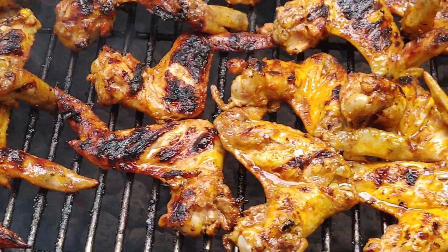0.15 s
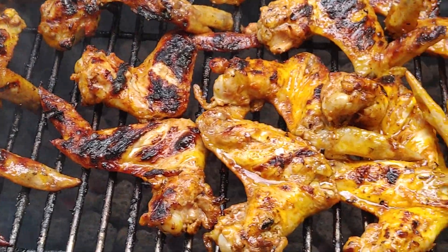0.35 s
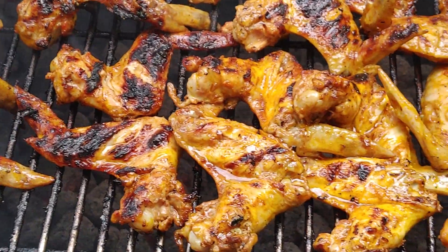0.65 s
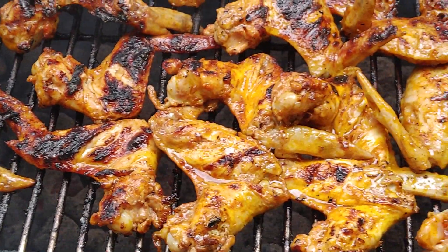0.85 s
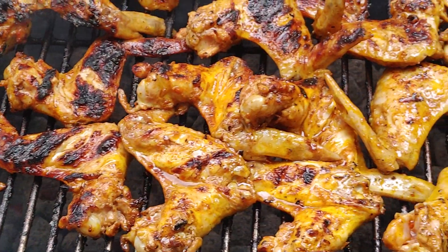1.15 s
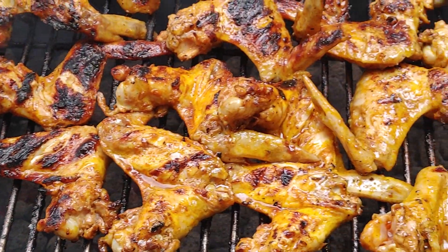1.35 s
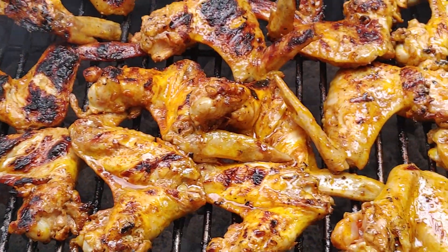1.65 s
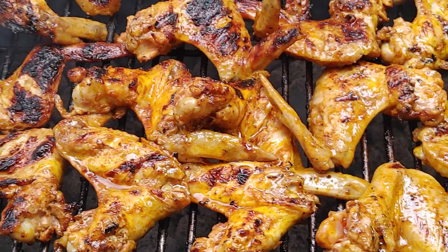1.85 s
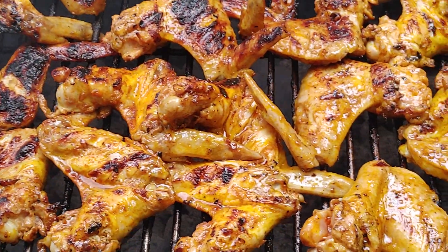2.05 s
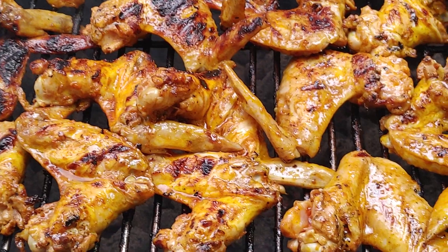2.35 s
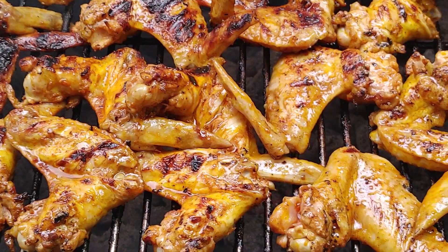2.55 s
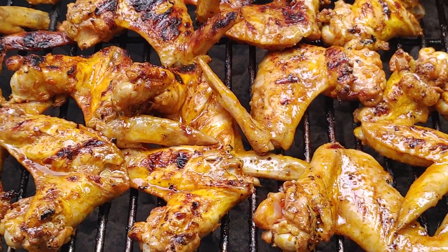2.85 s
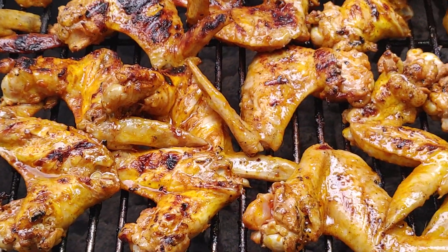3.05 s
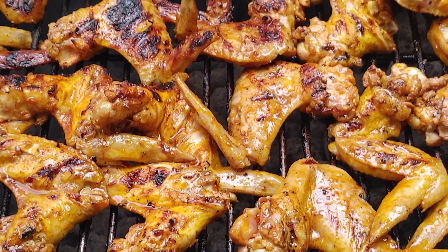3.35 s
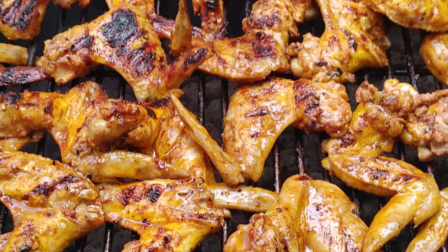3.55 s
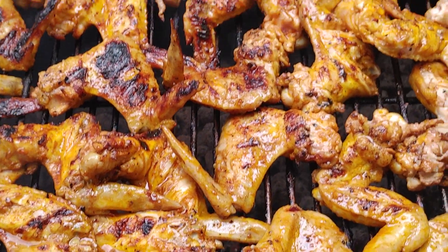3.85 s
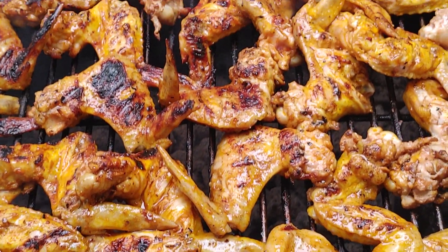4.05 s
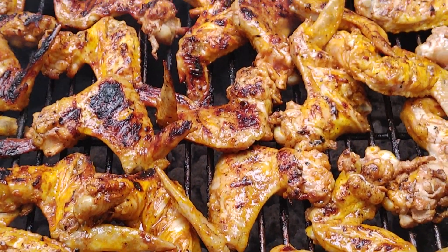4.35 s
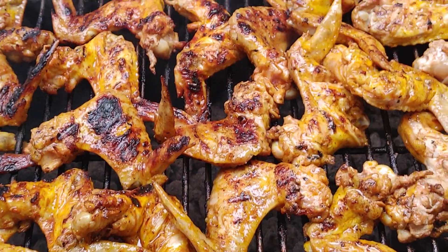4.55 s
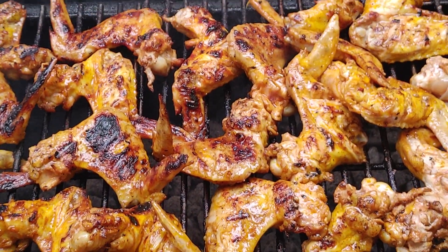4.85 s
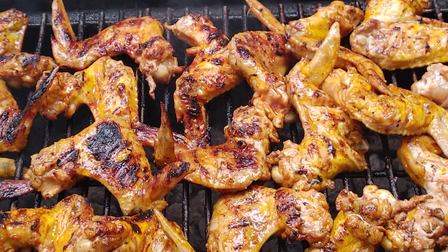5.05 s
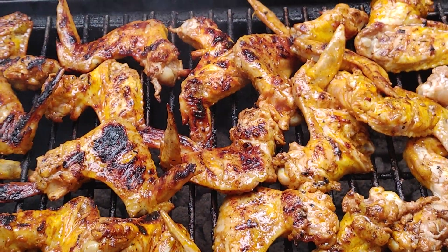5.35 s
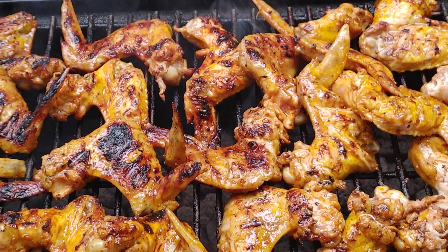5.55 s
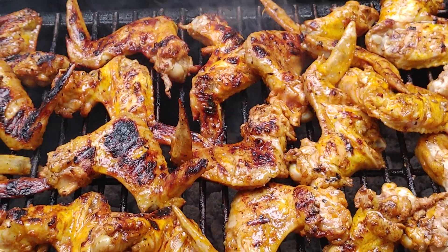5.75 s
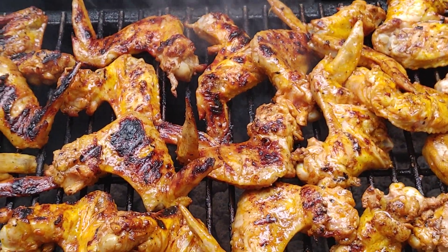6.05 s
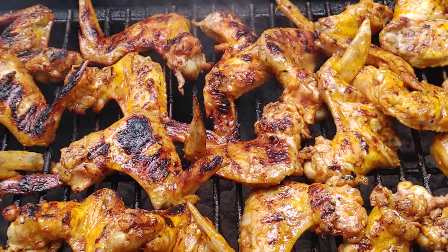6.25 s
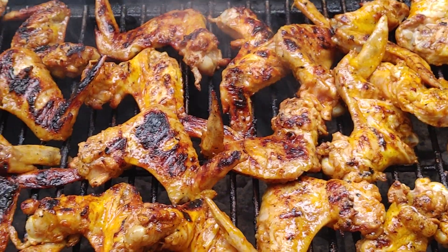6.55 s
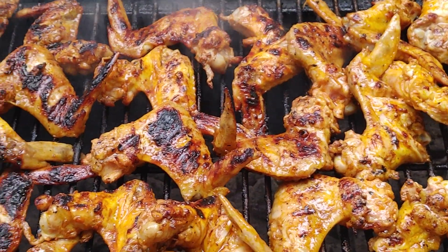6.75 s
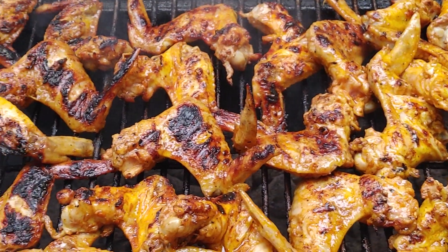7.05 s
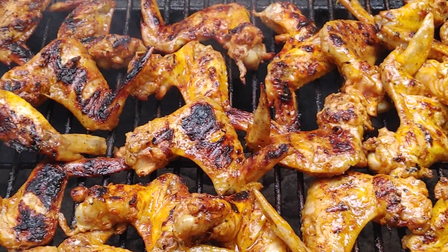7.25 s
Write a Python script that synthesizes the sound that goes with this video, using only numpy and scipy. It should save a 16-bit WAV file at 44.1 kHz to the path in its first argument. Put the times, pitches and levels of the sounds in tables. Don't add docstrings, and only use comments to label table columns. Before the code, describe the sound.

A dense, crisp sizzle of fat over hot coals, with irregular snaps, tiny drips and faint low puffs, heard very close in stereo.

```python
import sys
import numpy as np
from scipy import signal
from scipy.fft import rfft, irfft, next_fast_len
from scipy.io import wavfile

SR = 44100
rng = np.random.default_rng(int(sys.argv[2]) if len(sys.argv) > 2 else 0)


def elevation(decibels):
    levels = np.asarray(decibels, float)
    return 10 ** (levels / 20)


def store_pcm(level_fs):
    pcm = np.round(np.clip(level_fs, -1, 1) * 32767).astype(np.int16)
    wavfile.write(sys.argv[1], SR, np.atleast_2d(pcm).T)


N = 326781
FFT_SIZE = next_fast_len(N + 4096)
RIGHT_LAG_SAMPLES = 184
RIGHT_SHADE_DB = -8
SPIT_S = 0.0093
BOWL_HZ, BOWL_T60_S = 239, 0.035

# time in seconds, level in dB.
HEAT = [(0, -39), (.5, -40), (1.2, -40.5), (1.85, -40), (2.15, -41), (2.45, -39.5), (2.95, -40),
        (3.4, -39.5), (3.8, -41.5), (4.5, -41.5), (5.2, -40.5), (5.6, -41), (6.1, -41), (6.6, -41),
        (7.41, -41.5)]
# time in seconds, lift in dB, length in seconds.
SURGES = [(0.14, -4.5, 0.2), (0.348, 2.5, 0.13), (0.486, -0.5, 0.13), (0.544, 4, 0.042), (0.609, 2, 0.088),
          (0.813, -1.5, 0.05), (0.982, 2, 0.3), (1.596, -5, 0.064), (1.706, 3.5, 0.099), (1.816, -4, 0.33),
          (1.905, 5, 0.029), (2.02, 9, 0.042), (2.11, -0.5, 0.118), (2.252, 3.5, 0.17), (2.554, 1.5, 0.067),
          (2.86, -4.5, 0.094), (2.9, 6, 0.029), (3.038, -1.5, 0.1), (3.307, 3.5, 0.03), (3.462, -3.5, 0.18),
          (3.542, 3.5, 0.23), (3.92, -4, 0.058), (3.991, 2, 0.05), (5.07, -3, 0.12), (5.3, 5, 0.063),
          (5.454, -4, 0.1), (5.69, -6.5, 0.074), (5.913, 1, 0.091), (6.438, -3.5, 0.09), (6.715, -5, 0.094)]
# time in seconds, lift in dB.
SPITS = [(0.065, 2.2), (0.541, 3), (0.605, 8.5), (0.755, 0), (0.885, 2), (1.703, 2), (1.924, 8), (2.254, 6),
         (2.555, 0), (2.896, 1), (3.251, 5), (3.504, 7), (3.54, 8), (3.841, 5), (3.989, -1), (4.117, 4),
         (4.259, 3), (4.446, -1), (4.624, 0), (4.935, 5), (5.021, 4), (5.293, 2), (5.653, 6), (5.736, -1),
         (5.793, 4), (5.882, 9), (6.465, 6), (6.535, 1), (7.118, 0), (7.25, -3)]
# time in seconds, lift in dB.
RIM = [
    (0, -0.5),
    (1.3, -0.5),
    (2.3, -1),
    (3.6, 0),
    (4.5, 3),
    (5.3, 4),
    (7.41, 1),
]
# frequency in Hz, left in dB per Hz, right in dB per Hz.
BODY = [(30, -33.5, -34.5), (59.4, -28, -23.5), (96, -17.5, -17), (129, -22.5, -27), (170, -17.5, -18.5),
        (230, -14, -14.5), (307, -17.5, -18.5), (398, -26, -21.5), (489, -22, -23.5), (592, -13.5, -13),
        (696, -24, -22.5), (870, -15.5, -21.5), (1193, -10, -12), (1360, -7, -10.5)]
# frequency in Hz, left in dB per Hz, right in dB per Hz.
PORTS = [(2130, -11.5, -8), (2740, -2.5, -3), (3240, -3.5, -3), (3730, 0, -1.5), (5170, -0.5, -0.5),
         (5800, -6.5, -2.5), (6220, -2, 1), (8050, 0.5, -6), (9800, -14, -8.5), (9840, -6, -13),
         (10940, -2, -4.5), (11600, 3, -3), (12760, -7.5, -11), (14900, -11, -8.5)]
# frequency in Hz, width in Hz, lift in dB.
BARS = [
    (590, 92, -4.5),
    (710, 26, 5.5),
    (1030, 28, 7.5),
    (1151, 56, 6.5),
    (1422, 92, 5),
    (1606, 21, 5.5),
    (4050, 300, 3),
]
# start in seconds, left in dB, right in dB, ring in Hz.
POPS = [(0.0431, -11, -15, 6500), (0.3557, -1, -6, 11800), (0.3618, -17, -13, 6590),
        (0.5453, -19, -21, 4150), (0.7551, -14, -25, 4000), (0.9584, -32, -20, 6500),
        (1.3803, -49, -15, 4470), (1.6346, -11, -13, 4070), (1.7061, -18, -21, 3930),
        (1.9243, -11, -14, 10720), (2.1788, -10, -14, 4120), (2.2492, -23, -16, 7150),
        (2.5326, -10, -8, 7400), (2.6924, -18, -26, 4060), (2.7454, -12, -21, 7190),
        (2.8835, -11, -20, 10590), (2.8961, -27, -19, 7750), (3.2596, -17, -20, 7240),
        (3.3111, -28, -6.5, 6250), (3.3748, -11, -7, 6980), (3.4145, -12, -10, 7000),
        (3.5378, -10, -23, 11370), (3.8056, -20, -13, 5930), (4.0292, -14, -56, 4130),
        (4.5443, -8, -12, 7600), (4.6152, -15, -18, 3900), (5.2898, -20, -16, 6700),
        (5.3324, -10, -24, 7800), (5.7929, -17, -20, 7970), (5.9169, -11, -14, 6930)]
# start in seconds, left in dB, ring in Hz.
LEFT_POPS = [(0.8795, -13, 3600), (1.173, -19, 3700), (1.8947, -17, 5170), (2.016, -12, 4830),
             (2.0674, -15, 6590), (2.317, -24, 4950), (2.549, -20, 7670), (2.9764, -7, 11630),
             (3.3634, -16, 3800), (3.9865, -19, 11460), (4.446, -6, 11840), (4.495, -15, 6800),
             (4.507, -14.5, 3830), (4.6273, -14, 4050), (4.9345, -13, 11370), (5.0201, -15, 4050),
             (5.736, -14, 11540), (5.88, -15, 5440), (6.2029, -10, 7900), (6.6223, -16.5, 4070),
             (7.0425, -20, 4390), (7.117, -18, 7920), (7.25, -9, 10810), (7.3682, -10, 7240)]
# start in seconds, peak in dB, ring in Hz.
LEFT_CRACKLES = [(0.0581, -32, 1290), (0.1323, -30, 1300), (0.5349, -38.0, 1650), (0.5765, -40, 1030),
                 (0.6027, -41, 503), (1.1736, -35, 1030), (1.2085, -36, 1030), (1.2725, -36.0, 1030),
                 (1.9234, -36, 1300), (2.1448, -51, 710), (2.2486, -26, 1660), (2.6983, -38.0, 1300),
                 (3.3871, -43, 1030), (3.5369, -32, 710), (3.7561, -33, 1310), (3.7659, -32, 1620),
                 (4.3154, -60, 1650), (4.398, -42, 500), (4.6162, -32, 1300), (5.0709, -28, 1320),
                 (5.1571, -33, 1300), (5.288, -28.5, 710), (5.3593, -43, 500), (5.7351, -39, 1300),
                 (5.7898, -40.0, 1650), (6.5482, -31, 1650), (7.2302, -34, 1300), (7.2808, -30, 1650)]
# start in seconds, peak in dB, ring in Hz.
RIGHT_CRACKLES = [(0.0577, -35, 1030), (0.4707, -37, 1030), (0.5363, -41.0, 1300), (1.6337, -31.5, 2110),
                  (1.8351, -32, 1300), (2.2489, -29, 1290), (3.3339, -48, 500), (3.7561, -40, 494),
                  (4.0276, -47, 710), (4.395, -41.0, 2100), (4.7181, -42, 1650), (4.841, -38.0, 1650),
                  (5.0649, -48, 1650), (5.1576, -18, 2100), (5.4965, -35.5, 1300), (5.7356, -41, 1030),
                  (5.9534, -37, 710), (6.1268, -35, 2100), (6.6281, -38, 490), (6.952, -33, 2100),
                  (6.9773, -52, 1650), (7.0149, -41, 2100), (7.1745, -43, 2100), (7.2806, -37, 1650)]
# start in seconds, left in dB, right in dB, ring in Hz.
DRIPS = [(0.0587, -33, -46, 1340), (0.1183, -28, -35, 1360), (0.2773, -32, -31, 1110),
         (0.578, -33, -35, 1250), (0.7657, -30, -44, 1370), (1.1741, -32, -57, 1180),
         (1.273, -34, -32, 1210), (1.4849, -34, -28, 1390), (1.5541, -32, -40, 1590),
         (2.2497, -30, -35, 1460), (3.3, -38, -44, 1570), (3.3876, -32, -52, 1270),
         (3.5601, -30, -34, 1340), (3.7667, -27, -28, 1680), (4.4268, -43, -77, 1640),
         (4.4829, -46, -48, 1680), (4.4953, -56, -33, 1510), (4.6552, -47, -24, 1940),
         (4.9002, -29, -43, 1320), (5.0713, -47, -44, 1290), (5.1495, -30, -35, 1170),
         (5.2614, -29, -31, 1360), (5.2887, -38, -39, 1510), (5.4972, -25, -32, 1390),
         (5.7359, -63, -34, 1240), (6.0465, -31, -31, 1380), (6.5307, -28, -30.5, 1670),
         (6.6203, -28, -30, 1620), (6.6283, -26, -21, 1590), (7.2815, -39, -35, 1460)]
# start in seconds, peak in dB, ring in Hz.
LEFT_TICKS = [(0.0968, -14, 4100), (0.1744, -15, 5200), (0.2018, -20.0, 11400), (0.2755, -16, 7800),
              (0.424, -21, 5200), (0.4663, -22, 4100), (0.5451, -18, 4000), (0.6033, -17.0, 11400),
              (0.6596, -17, 4100), (0.7349, -20, 7800), (0.7977, -26, 6600), (1.3392, -25, 5200),
              (1.3796, -16.5, 4100), (1.4771, -20.0, 5200), (1.5345, -18, 4100), (1.5539, -23, 11400),
              (1.7056, -18.0, 4130), (2.125, -25, 7800), (2.2492, -22, 3000), (2.5503, -16.0, 7800),
              (2.5715, -15, 6600), (2.896, -9, 6600), (3.0022, -16, 7800), (3.3048, -18.0, 7800),
              (3.5376, -17.0, 5200), (3.7101, -15, 7800), (3.7195, -30, 7800), (3.8411, -20.0, 5200),
              (4.178, -13, 5150), (4.2586, -31, 11400), (4.354, -29, 5200), (4.4642, -21.0, 7800),
              (4.4947, -23, 5200), (4.5069, -31, 4100), (4.655, -21.0, 3040), (4.9578, -21.0, 4100),
              (4.9782, -18, 4100), (5.0673, -23, 5200), (5.2687, -28, 4100), (5.2893, -19.0, 7800),
              (5.5888, -21.0, 6600), (5.6449, -19, 4100), (5.8492, -22, 4100), (6.1512, -24, 4100),
              (6.3387, -15, 11400), (6.4053, -19, 5200), (6.5332, -24, 7800), (6.5582, -28, 5200),
              (6.9919, -21.0, 4100), (7.0038, -22.0, 4100), (7.0427, -24, 4100), (7.1167, -21, 7800),
              (7.1745, -24, 6600), (7.1964, -18, 11400), (7.3178, -23, 3030)]
# start in seconds, peak in dB, ring in Hz.
RIGHT_TICKS = [(0.4235, -14, 5200), (0.451, -19.0, 4100), (0.5453, -14, 5200), (0.7351, -25, 4100),
               (0.7551, -20.0, 7800), (0.9708, -22, 5150), (1.0375, -20.0, 3050), (1.0982, -19.0, 6600),
               (1.535, -21.0, 5240), (1.698, -18, 11400), (1.8843, -24, 5200), (1.9145, -18.0, 6600),
               (2.067, -18, 5200), (2.2837, -20, 3020), (2.3164, -16, 4100), (2.358, -15, 6600),
               (2.4456, -25, 6650), (2.4887, -27, 6600), (2.501, -19, 6600), (2.5503, -16.0, 7800),
               (2.6412, -26, 4100), (2.6856, -13, 6600), (2.7451, -21.0, 6600), (2.783, -21.0, 5200),
               (2.8089, -16, 4080), (2.883, -21.0, 5200), (2.9418, -16, 6600), (3.0949, -24, 5200),
               (3.2596, -26, 6600), (3.364, -20, 3000), (3.4241, -18, 6600), (3.4409, -22.0, 2980),
               (3.539, -19.0, 4100), (3.6, -18, 6600), (3.6203, -23, 3000), (3.6703, -27, 6600),
               (3.761, -30, 11400), (3.7701, -20, 4100), (4.029, -17, 6600), (4.039, -19, 6600),
               (4.1157, -32, 2950), (4.293, -18, 7800), (4.3541, -22.0, 7800), (4.7123, -23.0, 4100),
               (4.9344, -25, 3000), (5.2209, -12.5, 6600), (5.3324, -22.0, 6600), (5.7356, -17, 6600),
               (5.8492, -20, 7800), (6.1513, -13, 6600), (6.4598, -19, 6600), (6.5143, -20, 5200),
               (6.5337, -18, 6560), (6.6822, -16, 7800), (6.9512, -15, 5200)]
# start in seconds, peak in dB.
BOOMS = [(0.294, -46), (0.549, -50), (0.758, -50), (1.468, -50), (1.489, -51), (1.818, -55), (2.244, -53),
         (2.467, -65), (2.664, -56), (2.711, -59), (4.561, -58), (4.698, -62), (4.896, -50), (5.497, -54),
         (5.53, -58), (5.822, -39.5), (5.954, -52), (6.068, -53), (6.213, -45), (6.241, -38), (6.351, -50),
         (6.628, -39.5), (6.645, -50), (7.362, -49)]
# start in seconds, peak in dB, ring in Hz, left-right in dB.
KNOCKS = [(0.297, -45, 694, 7), (0.742, -52, 515, 3.5), (2.246, -60, 930, -0.5), (4.182, -49, 960, 7),
          (4.568, -70, 560, -8), (5.136, -55, 990, 24), (5.287, -50, 1005, 12), (6.107, -41.5, 1000, 11),
          (6.146, -47.5, 696, 5), (6.245, -42, 980, 8), (6.627, -44, 576, 2), (6.631, -34, 1120, 6),
          (7.359, -53, 500, -2)]
# start in seconds, peak in dB, ring in Hz, left-right in dB.
SPATTERS = [
    (5.1612, -27, 2740, -6),
    (5.217, -33, 2440, 1),
    (5.296, -32, 2500, -6),
    (5.3294, -35, 1950, -4),
    (5.741, -36, 2900, -10),
    (5.8736, -28, 2800, -2),
    (5.89, -44, 2790, -3),
]
# start in seconds, peak in dB, push +1 or pull -1.
LEFT_SPLATS = [(.355, -21, 1), (2.1464, -34, 1), (2.5506, -22, 1), (2.8944, -29, 1), (3.3744, -20, -1),
               (3.5377, -35, 1), (3.9866, -20.5, 1), (4.3992, -35, 1), (4.5445, -21.5, 1), (5.3602, -33, 1),
               (6.3685, -26.5, 1), (7.1478, -28, 1), (7.2137, -34, 1), (3.8056, -36, 1), (6.992, -42, 1),
               (1.0525, -40, 1)]
# start in seconds, peak in dB, push +1 or pull -1.
RIGHT_SPLATS = [
    (1.174, -41, -1),
    (1.273, -37, -1),
    (1.555, -32, -1),
    (3.9868, -33, -1),
    (4.0294, -30.5, -1),
    (4.1859, -32, -1),
    (4.4953, -31, -1),
    (5.3328, -29, -1),
]


def rms_one(x):
    return x / np.sqrt(np.mean(x ** 2) + 1e-20)


def drift(rate_hz):
    pole = np.exp(-80 * np.pi * rate_hz / SR)
    noise = rng.standard_normal(N // 40 + 2002)
    slow = signal.lfilter([1], [1, -2 * pole, pole * pole], noise)[2000:]
    return np.interp(np.arange(N) / 40, np.arange(len(slow)), rms_one(slow))


def in_time(rows):
    return np.interp(np.arange(N) / SR, *np.transpose(rows))


def surging():
    t = np.arange(0, N, 64) / SR
    rows = list(SURGES) + [(s, lift_db, SPIT_S) for s, lift_db in SPITS]
    bumps_db = sum(lift_db * np.exp(-(1.96 * (t - s) / length_s) ** 2) for s, lift_db, length_s in rows)
    return np.interp(np.arange(N) / SR, t, bumps_db)


def follow(level_db, heat, surge, rim, flicker_db):
    heat_db = in_time(HEAT)
    swing_db = heat * (heat_db - heat_db.mean()) + surge * surging() + rim * in_time(RIM)
    flicker = 0.18 * drift(4.4) + 0.64 * drift(28) + 0.55 * np.array([drift(36), drift(35)])
    return elevation(heat_db.mean() + level_db + swing_db + flicker_db * flicker)


def causal(gain):
    cepstrum = irfft(np.log(gain + 1e-9), FFT_SIZE)
    cepstrum[..., 1:FFT_SIZE // 2] *= 2
    cepstrum[..., FFT_SIZE // 2 + 1:] = 0
    return np.exp(rfft(cepstrum))


def grill_colour(hz):
    table = np.array([*BODY, *PORTS], float)
    colour = elevation([np.interp(np.log(hz), np.log(table[:, 0]), table[:, side]) for side in (1, 2)])
    for bar_hz, width_hz, lift_db in BARS:
        colour = colour * elevation(lift_db / (1 + (2 * (hz - bar_hz) / width_hz) ** 2))
    return colour


def sizzle(per_s, size_db, cycles, spread_samples, clump_db, hiss_db, near_db):
    chance = rng.random(N)
    clumping = .15 * drift(14) + .9 * drift(90)
    born = np.flatnonzero(chance < per_s * elevation(clump_db * clumping) / SR)
    size_luck, sign_luck, pitch_luck, near_luck = rng.random((N, 4))[born].T
    sizes = elevation(size_db * np.minimum(-np.log(size_luck), 4.0)) * np.sign(sign_luck - .5)
    path = np.round(spread_samples * rng.standard_normal(N)[born]).astype(int)
    late = np.clip(born + RIGHT_LAG_SAMPLES + path, 0, N - 1)
    nearer = elevation(near_db * (near_luck - .5))

    hz = np.arange(FFT_SIZE // 2 + 1) * SR / FFT_SIZE + 1e-3
    pitches_hz = np.geomspace(500, 15000, 14)
    pitch_class = (np.sqrt(pitch_luck) * len(pitches_hz)).astype(int)
    total, power = 0, 0
    for k, pitch_hz in enumerate(pitches_hz):
        mine = pitch_class == k
        left = np.bincount(born[mine], (sizes * nearer)[mine], N)
        right = np.bincount(late[mine], (sizes / nearer)[mine], N)
        bubble = 1 / (1 + 1j * cycles * (hz / pitch_hz - pitch_hz / hz))
        total = total + rfft([left, right], FFT_SIZE) * bubble
        power = power + (2 * k + 1) * abs(bubble) ** 2

    colour = grill_colour(hz)
    bursts = rms_one(irfft(total * causal(colour / np.sqrt(power)), FFT_SIZE)[:, :N])
    far = rng.standard_normal((2, FFT_SIZE))
    hiss = rms_one(irfft(rfft(far) * colour * np.clip(hz / 3500, 0, 1), FFT_SIZE)[:, :N])
    return rms_one(bursts + elevation(hiss_db) * hiss)


def below(x, hz):
    return signal.sosfiltfilt(signal.butter(4, hz, fs=SR, output="sos"), x)


def frying():
    x = sizzle(per_s=9000, size_db=2.0, cycles=1.75, spread_samples=7.0, clump_db=1.6, hiss_db=-8, near_db=6.0)
    to_850, to_2300, to_5500, to_9000, to_13000 = [below(x, hz) for hz in (850, 2300, 5500, 9000, 13000)]
    sputter = follow(level_db=3.04, heat=0.9, surge=0.57, rim=0.33, flicker_db=1.9) * (to_2300 - to_850)
    body = follow(level_db=7.5, heat=1.86, surge=0.57, rim=-0.4, flicker_db=0.98) * (to_5500 - to_2300)
    sheen = follow(level_db=10.6, heat=1.6, surge=0.35, rim=0.039, flicker_db=0.41) * (to_9000 - to_5500)
    fizz = follow(level_db=10, heat=1.6, surge=0.52, rim=-0.3, flicker_db=0.32) * (to_13000 - to_9000)
    rim_band = signal.butter(2, [1800, 2600], "band", fs=SR, output="sos")
    rim = (elevation(in_time(RIM)) - 1) * signal.sosfiltfilt(rim_band, sputter + body)
    deep = below(x, 130)
    rumble = elevation(-33.0 + 1.0 * drift(9.1)) * (to_850 - deep)
    stirring = elevation(-34.0 + 1.9 * drift(4.5)) * deep
    return rumble + stirring + sputter + body + rim + sheen + fizz


def vapour(level_db=-39.5, heat_share=0.34, edge_hz=13100, flutter_db=0.7, grain_db=1.8):
    heat_db = in_time(HEAT) + surging()
    grain = np.array([drift(180), drift(180)])
    swing_db = heat_share * (heat_db - heat_db.mean())
    gain = elevation(level_db + swing_db + flutter_db * drift(20) + grain_db * grain)
    high_pass = signal.butter(6, edge_hz, "high", fs=SR, output="sos")
    return gain * signal.sosfilt(high_pass, rng.standard_normal((2, N)))


def pop(left_db, right_db, hz, cycles=5.1, crack=0.95, trim_db=-5):
    t = np.arange(400) / SR
    fade = np.exp(-t * hz / cycles) * (1 - np.exp(-t * hz * 3))
    band = signal.butter(2, [3000, 11500], "band", fs=SR, output="sos")
    noise = signal.sosfilt(band, rng.standard_normal((2, 400)))
    wave = np.sin(2 * np.pi * hz * t) + crack * noise
    return elevation([[left_db + trim_db], [right_db + trim_db]]) * fade * wave


def crackle(peak_db, hz, far_db=-8, thin_db=-6):
    near_db = peak_db + thin_db * (hz < 800)
    return drip(near_db, near_db + far_db, hz, cycles=1.6, second=0.36, trim_db=-2.0)


def drip(left_db, right_db, hz, cycles=1.9, second=0.28, trim_db=-2.0):
    t = np.arange(1200) / SR
    phase = rng.uniform(0, 2 * np.pi, (2, 1))
    fade = np.exp(-t * hz / cycles) * (1 - np.exp(-t * hz * 3))
    wave = np.sin(2 * np.pi * hz * t) + second * np.sin(2 * np.pi * 0.72 * hz * t + phase)
    return elevation([[left_db + trim_db], [right_db + trim_db]]) * fade * wave


def tick(peak_db, hz, far_db=-9):
    return pop(peak_db, peak_db + far_db, hz, cycles=3.5, crack=1.44, trim_db=-3.0)


def boom(peak_db, swell_s=0.0053, trim_db=6.5):
    t = np.arange(3000) / SR
    fade = elevation(-60 * t / BOWL_T60_S) * (1 - np.exp(-(t / swell_s) ** 2)) * 2
    return elevation(peak_db + trim_db) * fade * np.sin(2 * np.pi * BOWL_HZ * t) * np.ones((2, 1))


def knock(peak_db, hz, pan_db):
    return drip(peak_db + pan_db / 2, peak_db - pan_db / 2, hz, cycles=6.0, second=0.16, trim_db=-1.5)


def splat(peak_db, way, push_s=.000085, creep_s=.00045):
    t = np.arange(-20, 600) / SR
    push = np.exp(-.5 * (t / push_s) ** 2)
    keep = np.exp(-1 / (creep_s * SR))
    return elevation(peak_db) * np.sign(way) * signal.lfilter([1, -1], [1, -keep], push) * [[1], [0]]


def place(rows, shape):
    out = np.zeros((2, N + 4000))
    for row in rows:
        at = int(row[0] * SR)
        pair = shape(*row[1:])
        late = at + RIGHT_LAG_SAMPLES
        out[0, at:at + pair.shape[1]] += pair[0]
        out[1, late:late + pair.shape[1]] += pair[1]
    return out[:, :N]


def either_port(left_rows, right_rows, shape):
    return place(left_rows, shape) + place(right_rows, lambda *row: shape(*row)[::-1])


def scene():
    bed = frying() + vapour()
    lesser = [(s, left_db, left_db + RIGHT_SHADE_DB, hz) for s, left_db, hz in LEFT_POPS]
    pops = place([*POPS, *lesser], pop) + either_port(LEFT_TICKS, RIGHT_TICKS, tick)
    pops = signal.sosfilt(signal.butter(8, 12400, fs=SR, output="sos"), pops)
    crackles = either_port(LEFT_CRACKLES, RIGHT_CRACKLES, crackle)
    drips = place(DRIPS, drip) + place([*KNOCKS, *SPATTERS], knock)
    booms = np.roll(place(BOOMS, boom), -90, axis=1)
    splats = np.roll(either_port(LEFT_SPLATS, RIGHT_SPLATS, splat), -20, axis=1)
    return bed + pops + crackles + drips + booms + splats


def band_limit(x):
    return signal.sosfilt(signal.butter(12, 17020, fs=SR, output="sos"), x)


def record(dry):
    rounded = .3 * np.tanh(dry / .3)
    top_cut = signal.ellip(12, .5, 70, 15730, fs=SR, output="sos")
    return band_limit(signal.sosfilt(top_cut, rounded))


dry = scene()
out = record(dry)
store_pcm(out)
```